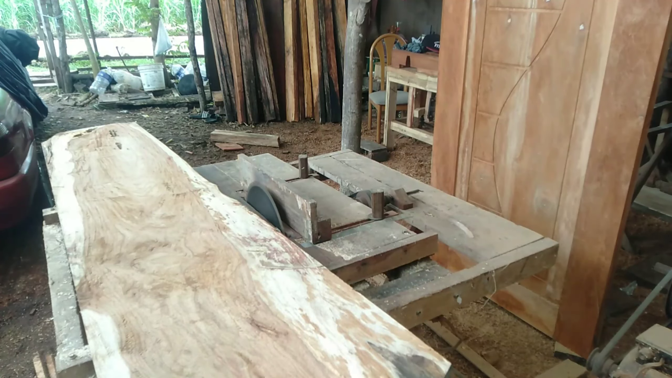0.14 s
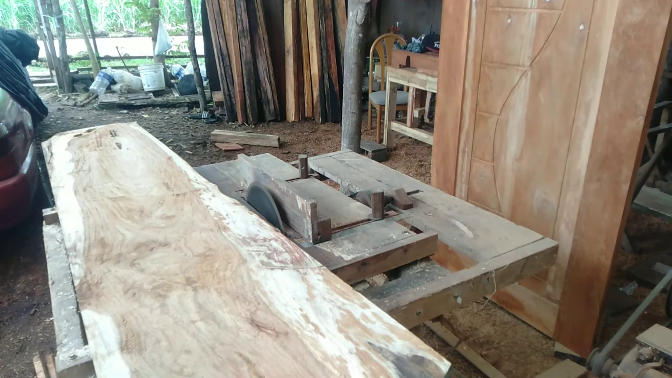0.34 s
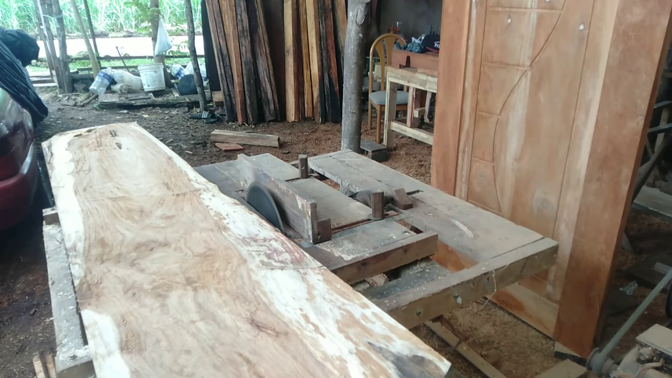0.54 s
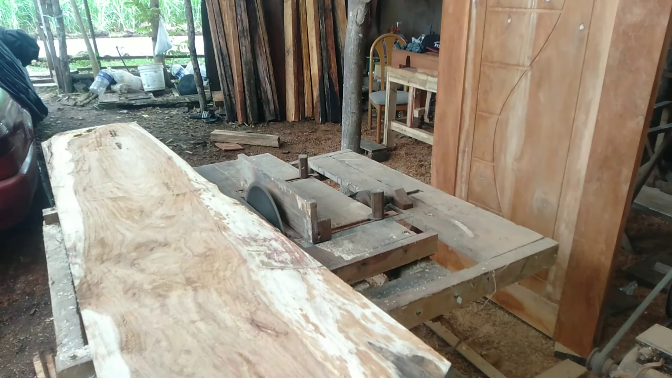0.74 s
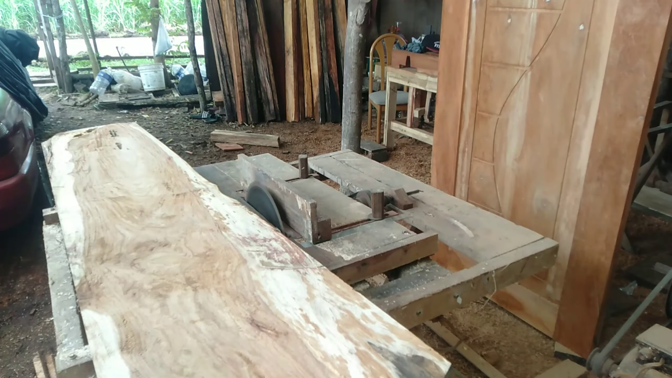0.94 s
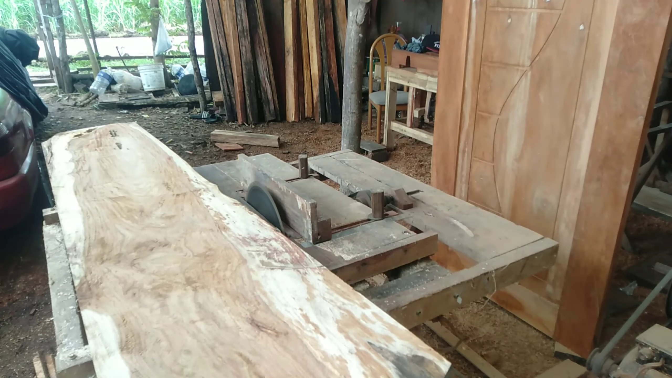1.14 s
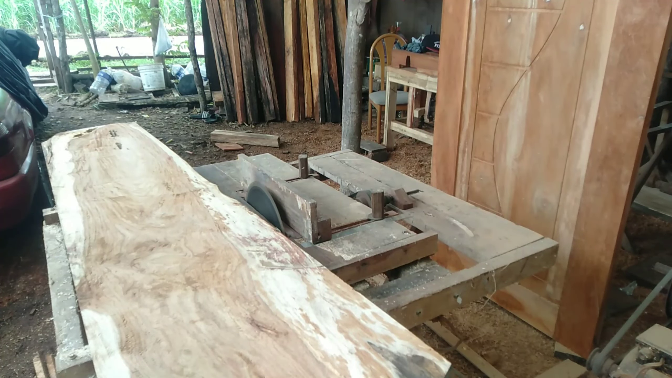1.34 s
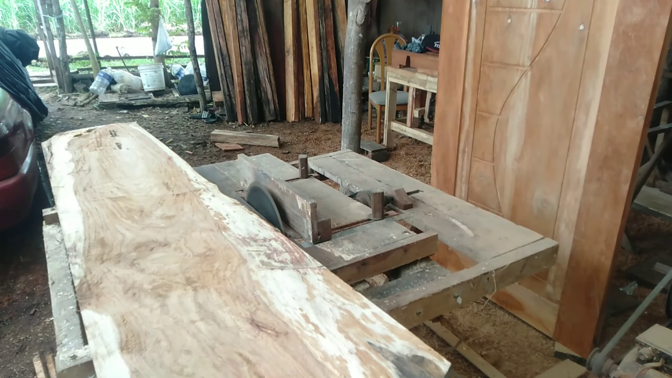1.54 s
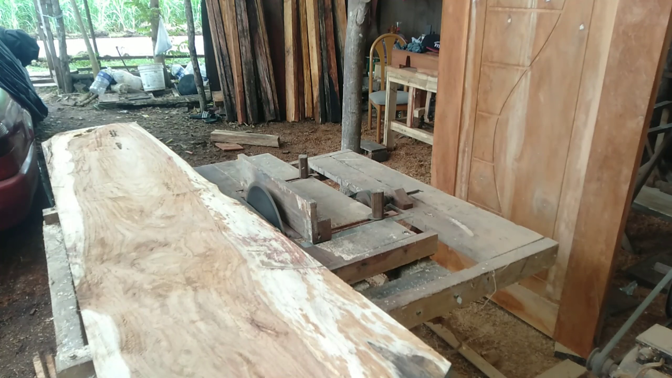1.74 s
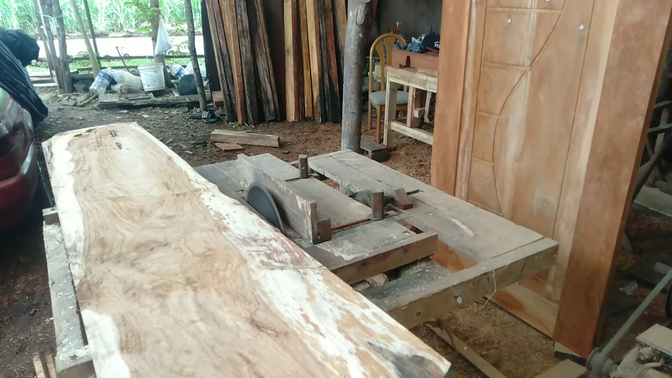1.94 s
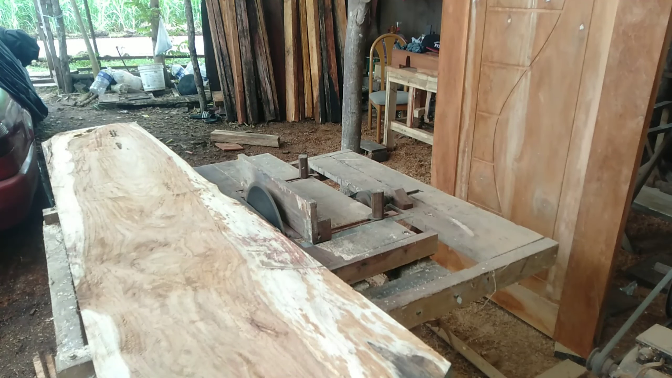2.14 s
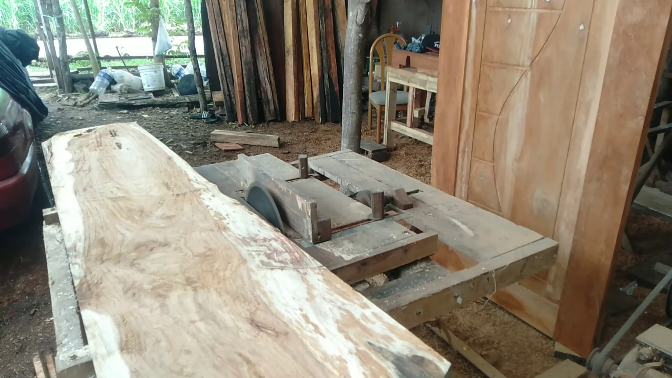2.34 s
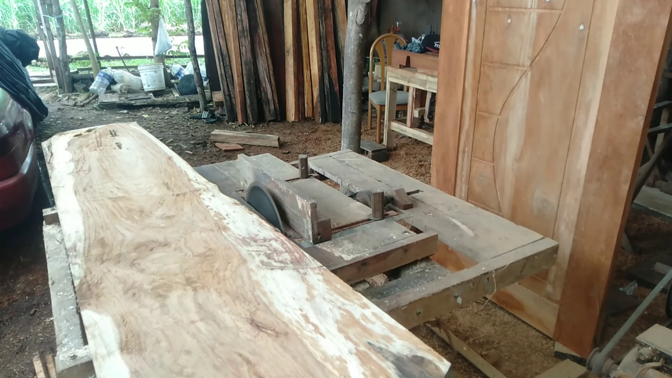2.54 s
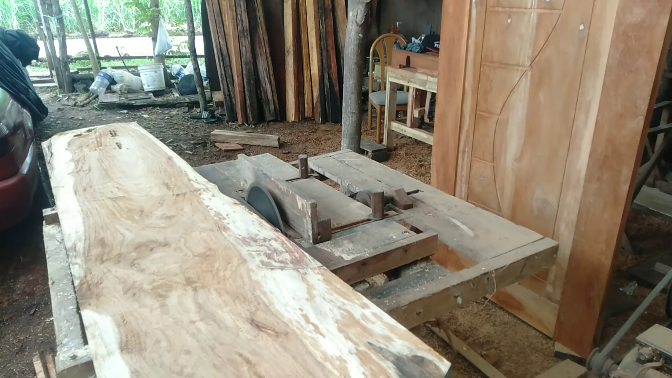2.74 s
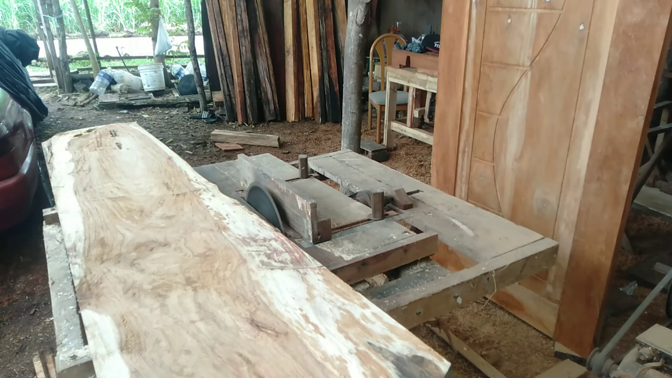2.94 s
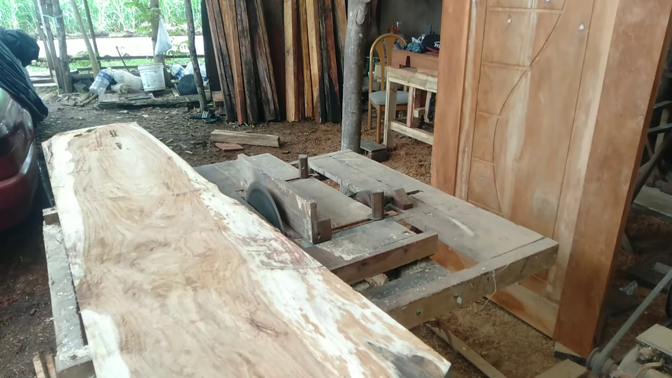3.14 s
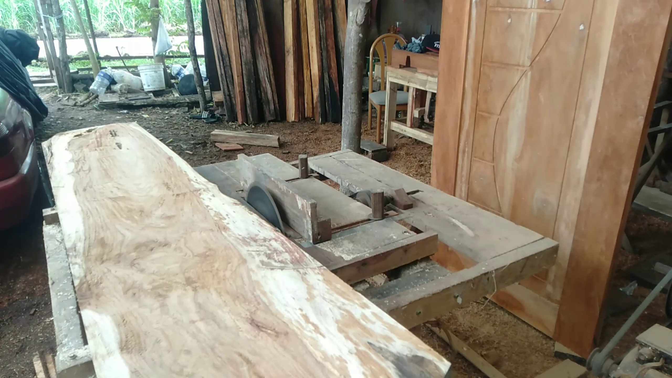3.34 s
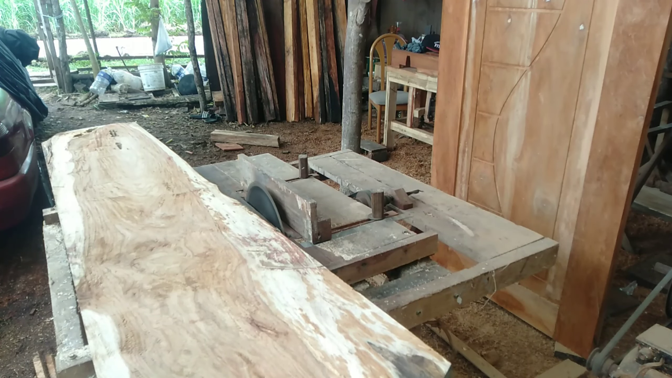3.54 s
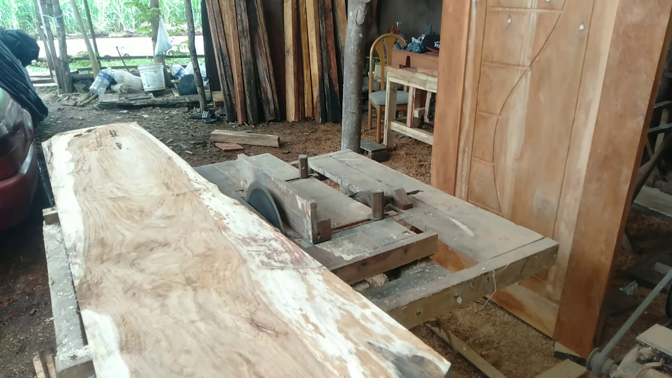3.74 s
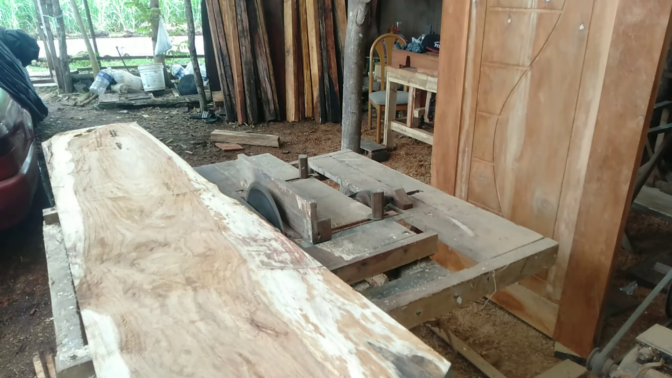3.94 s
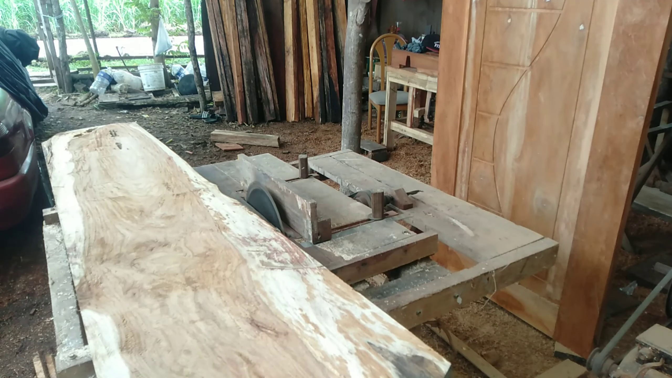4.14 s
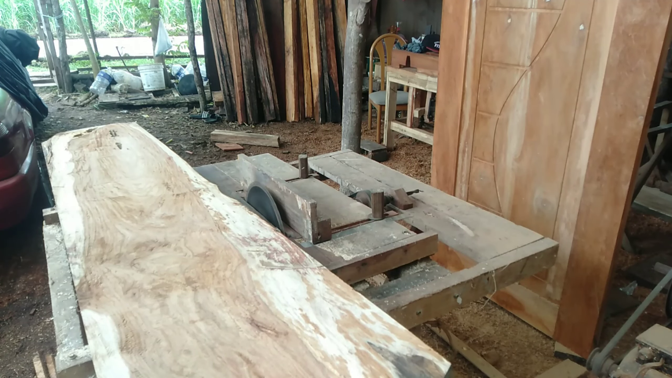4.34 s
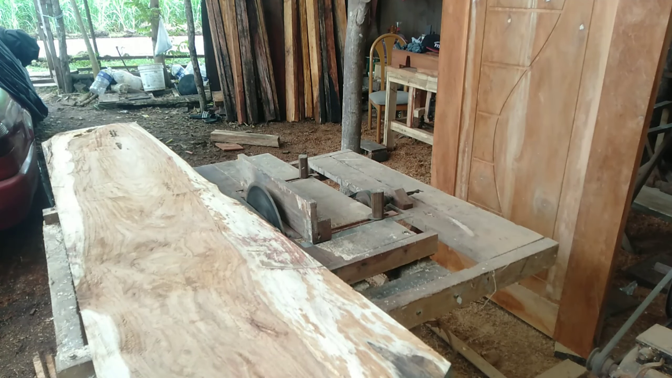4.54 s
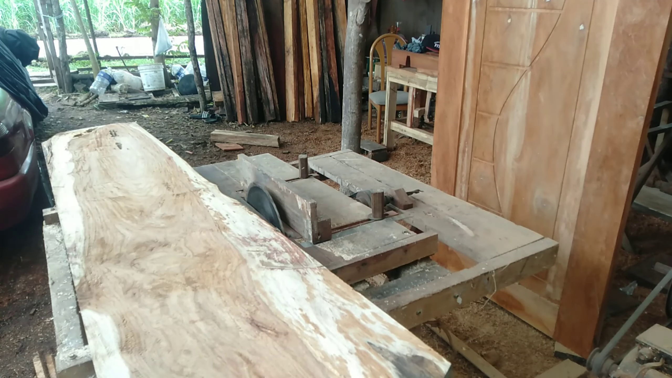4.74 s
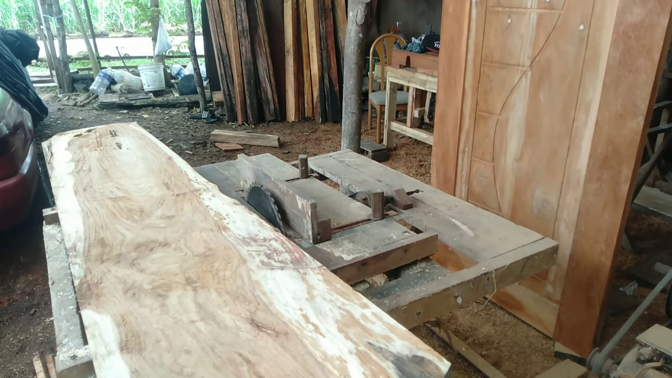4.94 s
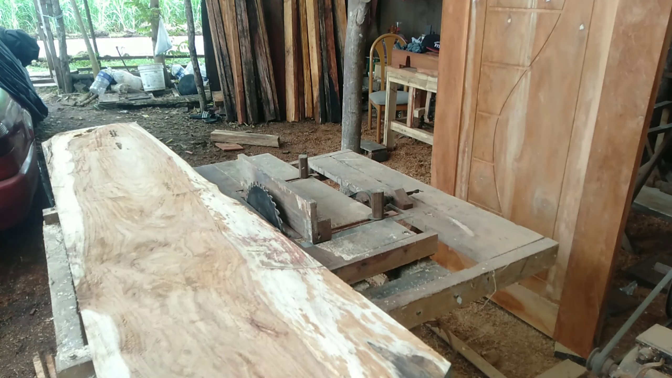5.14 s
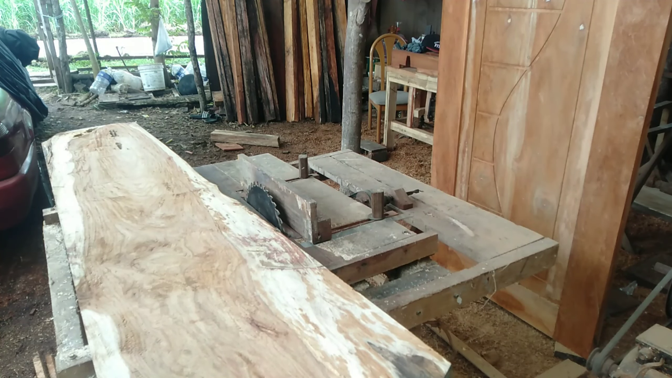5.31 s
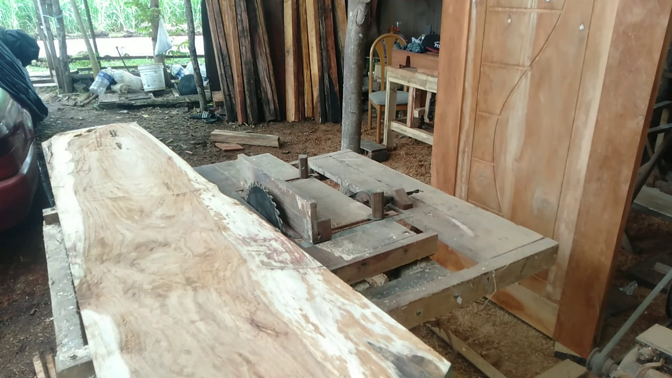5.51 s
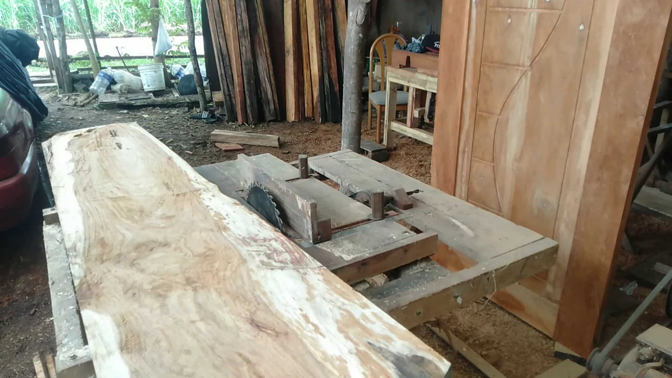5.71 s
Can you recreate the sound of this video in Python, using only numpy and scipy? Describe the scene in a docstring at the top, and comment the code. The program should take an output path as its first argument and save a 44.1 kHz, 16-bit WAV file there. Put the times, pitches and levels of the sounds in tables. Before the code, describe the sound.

Close mono pickup of a worn table saw running without cutting under an open shed roof. Its broad whoosh and rattle over a steady hum lasts under two seconds, then the drive cuts out and a clunk sounds. The blade coasts down with a descending groan, fading hiss, scattered bright ticks and woody knocks, and small steel rubs. At the end only faint outdoor rumble and a far motor remain.

```python
"""The rush and rattle of an idling belt-driven bench saw in an open workshop, over the hum of motor and blade.
Blade and fan turbulence, bearing blows and a once-a-turn graze are noise filtered by the machine's resonances.
The hum is a set of shaft orders. Switched off, the saw coasts down and one falling speed drives these layers.
Timed knocks, ticks and rubs stand out as it slows and stops; outside lie a low rumble and a far engine's drone."""
import sys
import numpy as np
from scipy import signal
from scipy.fft import rfft, irfft
from scipy.io import wavfile
from scipy.ndimage import uniform_filter1d

SR = 44100
rng = np.random.default_rng(int(sys.argv[2]) if len(sys.argv) > 2 else 0)


def file_out(sig):
    """Save sig as 16-bit WAV at sys.argv[1]."""
    # one column per channel
    cols = np.atleast_2d(sig).T
    # limit, then scale
    lim = np.clip(cols, -1, 1)
    pcm = np.round(lim * 32767).astype(np.int16)
    wavfile.write(sys.argv[1], SR, pcm)


N = 258845
TIME = np.arange(N) / SR  # s


def amp(db):
    """Decibels to gain."""
    return 10 ** (np.asarray(db) / 20)


def unit(x):
    """Scales to rms 1."""
    return x / np.sqrt(np.mean(x ** 2) + 1e-20)


def read(points, hz):
    """Reads a spectrum in dB on a log-frequency axis."""
    f, db = np.transpose(points)
    return np.interp(np.log(hz + 1), np.log(f + 1), db)


def drift(rate):
    """Random wandering of rms 1: noise low-passed at the given rate in Hz."""
    hz = np.fft.rfftfreq(N, 1 / SR)
    lowpass = 1 / (1 + (hz / rate) ** 4)
    return unit(irfft(rfft(rng.standard_normal(N)) * lowpass, N))


def ringing_noise(centre, width):
    """Noise of rms 1 through one resonance, both in Hz."""
    hz = np.fft.rfftfreq(N, 1 / SR)
    resonance = 1 / (1 + (2 * (hz - centre) / width) ** 2)
    return unit(irfft(rfft(rng.standard_normal(N)) * resonance, N))


def colour(x, points, resonances=(), size=8192):
    """Causal filter of unit energy: a broad spectrum with ringing resonances on top."""
    hz = abs(np.fft.fftfreq(size, 1 / SR))
    db = read(points, hz)
    for f, width, lift in resonances:
        db = db + lift / (1 + (2 * (hz - f) / width) ** 2)
    # minimum phase, so that nothing sounds before its cause
    spectrum = np.exp(np.conj(signal.hilbert(np.log(amp(db)))))
    response = np.fft.ifft(spectrum).real[:size // 2]
    return signal.oaconvolve(x, response / np.linalg.norm(response))[:N]


def once_a_turn(turns, sharpness):
    """A gate of rms 1 that swells once in every turn."""
    return unit(np.exp(sharpness * np.cos(2 * np.pi * turns)))


def impacts(per_s, spread_db):
    """A dense train of tiny blows of random sign, their sizes spread by the given dB."""
    hit = rng.random(N) < per_s / SR
    sign = rng.choice([-1, 1], N)
    size = amp(spread_db * np.clip(rng.standard_normal(N), -2, 2))
    return unit(hit * sign * size / np.sqrt(per_s))


def order_tone(turns, multiple, waver, blur):
    """One shaft order, unsteady in strength and phase; high orders smear more."""
    strength = np.sqrt(2) * (1 + waver * drift(8.4))
    phase = multiple * (turns + blur * drift(2.1)) + rng.random()
    return strength * np.sin(2 * np.pi * phase)


def patchy(x, patch_db, size=512):
    """Neighbouring frequency bands swell and sink independently, by patch_db rms."""
    z = signal.stft(x, nperseg=size)[2]
    across_bands = uniform_filter1d(rng.standard_normal(z.shape), size=5, axis=0)
    patches = uniform_filter1d(across_bands, size=5, axis=1)
    return signal.istft(z * amp(patch_db * unit(patches)), nperseg=size)[1][:N]


IDLE_SPEED = 61.2  # blade turns per second under power
COAST_FROM = 1.775  # s, the speed starts to fall
# turns per second lost each second: always; extra at idle speed; how steeply that extra grows with speed
FRICTION, DRAG, DRAG_POWER = 14.3, 26, 4
# extra loss at standstill (turns per second each second); speed over which it fades (turns per second)
GRIP, GRIP_SPEED = 7, 4.4


def coast():
    """Blade speed: steady at idle, then braked by drag while fast and by dry friction, which grips at the end."""
    speed = np.linspace(IDLE_SPEED, 0, 1000)
    drag = DRAG * (speed / IDLE_SPEED) ** DRAG_POWER
    braking = FRICTION + drag + GRIP * np.exp(-speed / GRIP_SPEED)
    elapsed = np.cumsum((speed[0] - speed[1]) / braking)
    return np.interp(TIME, COAST_FROM + elapsed, speed)


SLACK_FROM, SLACK_S = 1.84, 0.24  # the belt unloads: start (s), time taken (s)


def loudness(speed, law):
    """Gain that grows as a power of the speed, levels off, and shifts while the belt is under load."""
    ceiling_db, half_speed, steepness, load_db = law
    load = np.clip(1 - (TIME - SLACK_FROM) / SLACK_S, 0, 1)
    push = (speed / half_speed) ** steepness
    return amp(ceiling_db + load_db * load) * push / (1 + push)


# depth at standstill (dB rms), speed at which that depth is halved (turns per second), rate (Hz)
UNEVEN_DB, UNEVEN_SPEED, UNEVEN_HZ = 1.2, 11, 16


def fitful(speed):
    """The slower the shaft, the more unevenly it rubs."""
    return amp(UNEVEN_DB * drift(UNEVEN_HZ) / (1 + (speed / UNEVEN_SPEED) ** 2))


# Resonances of bench, guard and blade, shared by the layers below.
# Each row: frequency in Hz, width in Hz, lift in dB.
MACHINE_RESONANCES = [(206, 46, 6.5), (318, 38, 4), (405, 41, 2.5), (764, 35, 7.5), (808.3, 15, 9.5),
                      (1195, 62, 3), (1297, 60, 9), (1426, 126, 3.5), (2253, 57, 8), (2310, 220, -4),
                      (2685, 67, 2.5), (3492, 100, 7), (3740, 52, 8.5), (4050, 100, 3.5), (4560, 56, 9.5),
                      (5100, 60, 5), (5770, 150, 6.5), (6950, 190, 10.5), (7500, 150, 0.5),
                      (10770, 99, 4.5), (11500, 500, 3.5)]
# Broad spectrum of the bearing rattle. Each row: frequency in Hz, relative level in dB.
RATTLE_SPECTRUM = [(30, -40), (90, -24.5), (160, -8), (230, -7), (280, -9.5), (400, -9), (490, -15),
                   (720, -0.5), (1000, -4), (1750, -6), (3000, -14.5), (3900, -20.5), (5000, -25.5),
                   (8500, -38.5)]
# Rattle against blade speed: ceiling in dB, speed at half strength in turns per second,
# steepness below it (power), change under load in dB.
RATTLE_LOUDNESS = (-28.5, 22.5, 2, -6)


def bearings(speed, turns):
    """Rolling blows in the worn bearings, thinning out as the shaft slows, ring the wooden bench."""
    blows = impacts(per_s=70 * speed + 1100, spread_db=0.0)
    throb = np.interp(speed, [16, 28, 60], [.13, .2, .15])  # the shaft wobbles most near half speed
    blows *= once_a_turn(turns, throb) * amp(0.24 * drift(30)) * fitful(speed)
    return loudness(speed, RATTLE_LOUDNESS) * unit(colour(blows, RATTLE_SPECTRUM, MACHINE_RESONANCES))


# Broad spectrum of the rushing air. Each row: frequency in Hz, relative level in dB.
RUSH_SPECTRUM = [(30, -30), (80, -15), (150, -10.5), (220, -10.5), (480, -8.5), (620, -2.5), (1200, 2),
                 (1850, -2), (2400, 0.5), (3100, -4.5), (3900, -6.5), (5000, -16), (6300, -15),
                 (8300, -23.5), (15000, -21.5)]
# Rush against blade speed: ceiling in dB, speed at half strength in turns per second,
# steepness below it (power), change under load in dB.
RUSH_LOUDNESS = (-28.5, 28, 4, 4.5)


def air(speed, turns):
    """Turbulence from the teeth and the motor fan, only lightly coloured by the machine."""
    rush = rng.standard_normal(N) * once_a_turn(turns, sharpness=0.041) * amp(0.91 * drift(55))
    milder = [(f, width, 0.58 * lift) for f, width, lift in MACHINE_RESONANCES]
    return loudness(speed, RUSH_LOUDNESS) * unit(colour(rush, RUSH_SPECTRUM, milder))


# Broad spectrum of the thin sizzle. Each row: frequency in Hz, relative level in dB.
GRAZE_SPECTRUM = [(100, -61), (4000, -16.5), (7000, -11), (8600, -10), (9700, -1), (11000, -1), (11600, 2),
                  (12200, -4), (12800, -6), (15000, -20.5)]
# Graze against blade speed: ceiling in dB, speed at half strength in turns per second,
# steepness below it (power), change under load in dB.
GRAZE_LOUDNESS = (-37.5, 34.5, 3, 1.5)


def graze(speed, turns):
    """The slightly warped blade catches its slot once a turn; the sizzle surges, then sinks."""
    catch = 1 + 0.72 * np.exp(-(turns % 1) / 0.23)  # decay in turns
    flutter = amp(1.2 * drift(60))
    scrape = impacts(per_s=9000, spread_db=1.5) * catch * flutter * fitful(speed)
    return loudness(speed, GRAZE_LOUDNESS) * unit(colour(scrape, GRAZE_SPECTRUM, MACHINE_RESONANCES))


BELT_RATIO = .7917  # motor turns per blade turn
POWER_OFF = 1.875  # s, middle of the fade of the driven tones
# Steady tones of the driven motor and blade, as multiples of the motor speed.
# Each row: multiple of the motor speed, level in dB rms before wavering.
DRIVEN_TONES = [(1.7, -63), (4, -35), (4.44, -46), (5, -69), (6.92, -44), (8.22, -52), (9.45, -57),
                (10.11, -51.5), (12, -44.5), (16.44, -42), (18.9, -49.5), (27.78, -42), (48.35, -42.5),
                (51.3, -46.5)]
# Shaft vibrations and the bench mode that each one shakes. Each row: multiple of the blade speed,
# mode in Hz, width in Hz, level in dB rms at the mode before wavering.
BENCH_SWEEPS = [(2, 122, 23, -48.5), (4, 224, 40, -42), (5, 193, 33, -49.5), (5.6, 189.5, 12, -40),
                (6, 237, 12, -42.5), (6.33, 158, 22.6, -43.5), (7, 208, 11, -43.5), (8.3, 200, 53, -47),
                (8.3, 162, 19, -45.5), (9, 238, 14, -46.5), (9.7, 160, 24, -49), (10.5, 194, 14, -43)]


def hum(speed, turns):
    """Driven tones stop with the current; each shaft order swells as it sinks through a mode of the bench."""
    out = np.zeros(N)
    for k, db in DRIVEN_TONES:
        out += amp(db) * order_tone(turns * BELT_RATIO, k, waver=min(0.025 * k, .6), blur=0.0037)
    out *= np.clip((POWER_OFF - TIME) / 0.024 + .5, 0, 1)  # a 24 ms fade
    for k, hz, width, db in BENCH_SWEEPS:
        swell = 1 / (1 + (2 * (k * speed - hz) / width) ** 2) ** 0.84
        moving = np.minimum(speed, 1)  # silent at standstill
        out += amp(db) * swell * moving * order_tone(turns, k, waver=.2, blur=.008)
    return out


def strikes(rows, points, contact):
    """Each blow is a hard first contact and a short chatter into the resonances of the machine."""
    force = np.zeros(N)
    for s, db, decay in rows:
        force += amp(db) * (TIME >= s) * np.exp(-np.maximum(TIME - s, 0) / decay)
    force *= rng.standard_normal(N)
    for s, db, _ in rows:
        force[round(s * SR)] += contact * amp(db)
    return colour(force, points, MACHINE_RESONANCES)


# Knocks of switch, belt and pulley.
# Each row: start in seconds, starting level of the chatter in dB, decay time constant in seconds.
KNOCK_BLOWS = [(2.06, -15, 0.0054), (2.072, -23.5, 0.019), (3.708, -41.5, 0.024), (3.805, -49, 0.013),
               (3.91, -42, .04), (4.342, -40, .005), (4.415, -40, .008), (4.441, -36.5, 0.0068),
               (4.473, -38, 0.0087), (4.667, -44, 0.013), (4.757, -40.5, 0.014), (4.836, -46, 0.015),
               (4.866, -40.5, 0.011), (4.898, -46, 0.0058), (4.972, -52, 0.038), (5.405, -53.5, 0.024)]
# Broad spectrum of a knock. Each row: frequency in Hz, relative level in dB.
KNOCK_SPECTRUM = [(40, -22), (150, -26), (240, 2), (420, -7), (750, 3.5), (1700, -4), (2500, -8),
                  (4000, -20.5), (7000, -32), (15000, -32)]


def knocks():
    """Switch, belt and pulley strike the machine with full-bodied blows."""
    return strikes(KNOCK_BLOWS, KNOCK_SPECTRUM, contact=3.5)


# level (dB rms at the start), upper edge (Hz), decay time constant (s)
THUD_DB, THUD_HZ, THUD_S = -50, 90, .12


def thud():
    """The heavy bench shudders after the first knock: decaying low noise."""
    age = TIME - KNOCK_BLOWS[0][0]
    return amp(THUD_DB) * (age >= 0) * np.exp(-abs(age) / THUD_S) * drift(THUD_HZ)


# Bright ticks as the saw slows and after it stops.
# Each row: start in seconds, starting level of the chatter in dB, decay time constant in seconds.
TICK_BLOWS = [(3.333, -31, .004), (3.451, -38, 0.0045), (3.527, -33.5, .008), (3.573, -34, 0.0056),
              (3.8, -39, .006), (3.89, -38, .006), (4.052, -41, 0.0057), (4.08, -41, .005),
              (4.281, -47, .004), (4.47, -43.5, 0.011), (4.757, -52, .01), (4.835, -60, .005),
              (5.3955, -51, 0.0046), (5.6375, -58, 0.021)]
# Broad spectrum of a tick. Each row: frequency in Hz, relative level in dB.
TICK_SPECTRUM = [(100, -19), (900, 3), (3500, 6), (6000, -3.5), (8500, -2.5), (11500, 4.5), (13000, -3),
                 (15000, -11)]


def ticks():
    """Bright ticks as the saw slows and after it stops: short blows with a lighter first contact."""
    return strikes(TICK_BLOWS, TICK_SPECTRUM, contact=1.5)


# Rings of the steel disc, by name: frequency in Hz, width in Hz.
DISC_RINGS = {"low": (1345, 75), "middle": (3600, 290), "high": (11200, 1200)}
# The slowing blade rubs and sings.
# Each row: start in seconds, length in seconds, peak level in dB, name of the ring.
BLADE_RUBS = [(3.502, .1, -51, "high"), (4.507, .05, -60, "middle"), (4.56, .05, -66, "high"),
              (4.575, .045, -54, "middle"), (4.637, .055, -58, "middle"), (4.72, .09, -70, "high"),
              (4.833, .035, -59, "middle"), (4.86, .06, -75, "high"), (4.955, 0.1, -56, "low"),
              (4.97, 0.13, -74, "high"), (5.05, .1, -71, "middle"), (5.145, 0.079, -62, "low"),
              (5.15, .13, -74.5, "high")]
# shares of a rub's length at its peak and at its bend; share of its strength left at the bend
RUB_RISE, RUB_HOLD, RUB_SAG = .15, 0.55, .74


def rubs():
    """Each rub swells quickly and fades, feeding one ring of the steel disc."""
    out = np.zeros(N)
    rings = {name: ringing_noise(hz, width) for name, (hz, width) in DISC_RINGS.items()}
    for s, length, db, name in BLADE_RUBS:
        swell = np.interp((TIME - s) / length, [0, RUB_RISE, RUB_HOLD, 1], [0, 1, RUB_SAG, 0])
        out += amp(db) * rings[name] * swell
    return out


def workshop(x, wet_db, t60, count=900):
    """Sparse reflections from bench, boards and roof die quickly in the open shed."""
    # about 2000 reflections a second, the first after some 3 ms
    at = ((np.arange(count) + rng.random(count)) * SR / 2000).astype(int) + SR // 300
    taps = np.zeros(at[-1] + 1)
    taps[at] = rng.choice([-1, 1], count) * np.exp(-np.log(1000) * at / SR / t60)
    reflections = signal.oaconvolve(x, taps / np.linalg.norm(taps))[:N]
    return (x + amp(wet_db) * reflections) / np.hypot(1, amp(wet_db))


# Far engine outside. Each row: time in seconds, pitch in Hz, level in dB.
ENGINE_PATH = [(0, 96, -74), (4.9, 97.3, -71.5), (5.251, 98, -54.5), (5.5, 94.5, -60), (5.62, 101.6, -61),
               (5.75, 101.2, -51.5), (5.87, 100, -56)]
# Orders of the far engine. Each row: multiple of its pitch, level in dB relative to the engine level.
ENGINE_TONES = [(.5, -25), (1, -4), (1.5, -10.5), (2, -11.5), (3, -17.5)]
# Spectrum of the outdoor rumble. Each row: frequency in Hz, relative level in dB.
YARD_SPECTRUM = [(25, -21), (50, -10), (80, -8), (160, 0.5), (230, -3.5), (290, -16), (500, -14),
                 (780, -15.5), (1350, -17), (3000, -25), (5000, -34), (8000, -39), (11000, -35),
                 (15000, -39)]
YARD_DB = -57.5  # dB rms of the rumble


def yard():
    """Low outdoor rumble from filtered noise and the drone of a far engine from wavering orders."""
    s, hz, db = np.transpose(ENGINE_PATH)
    turns = np.cumsum(np.interp(TIME, s, hz)) / SR
    drone = sum(amp(rel) * order_tone(turns, k, waver=0.2, blur=0.018) for k, rel in ENGINE_TONES)
    rumble = patchy(colour(rng.standard_normal(N), YARD_SPECTRUM), patch_db=2.0)
    return amp(np.interp(TIME, s, db)) * drone + amp(YARD_DB) * unit(rumble)


def scene():
    """One speed drives the turning parts; the saw's noises reflect in the shed, with hum, thud and yard added."""
    speed = coast()
    turns = np.cumsum(speed) / SR
    running = bearings(speed, turns) + air(speed, turns) + graze(speed, turns)
    # contacts shift, so the running noise is patchy
    machine = patchy(running, patch_db=1.02) + knocks() + ticks() + rubs()
    saw = workshop(machine, wet_db=-12.0, t60=0.28) + hum(speed, turns) + thud()
    return (saw + yard())[None]


EDGE_HZ = 15520  # upper band edge


def record(dry):
    """The band limit of the recorder: a steep low-pass."""
    lowpass = signal.firwin(511, EDGE_HZ, window=("kaiser", 9), fs=SR)
    return signal.oaconvolve(dry, lowpass[None], "same")


dry = scene()
out = record(dry)
file_out(out)
```